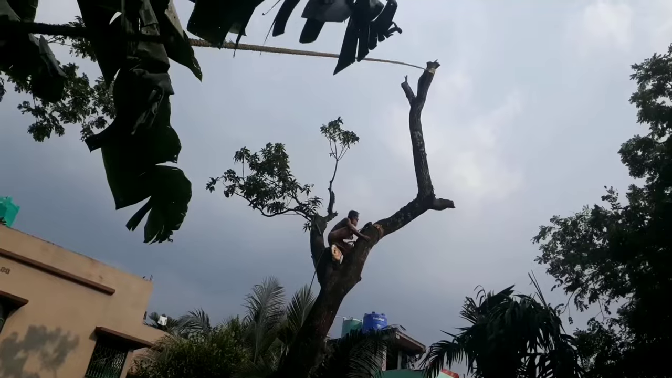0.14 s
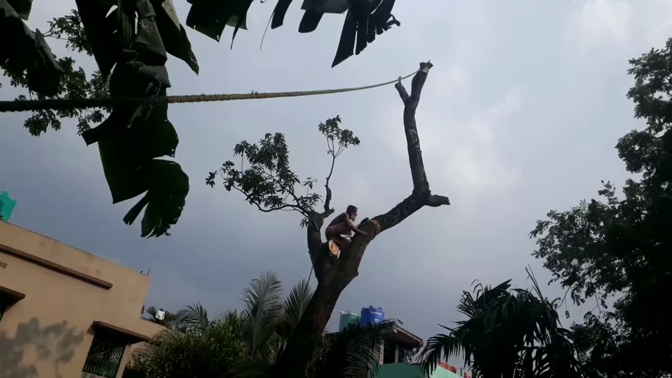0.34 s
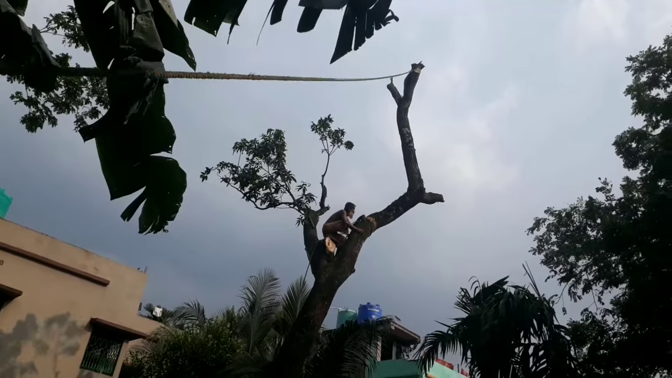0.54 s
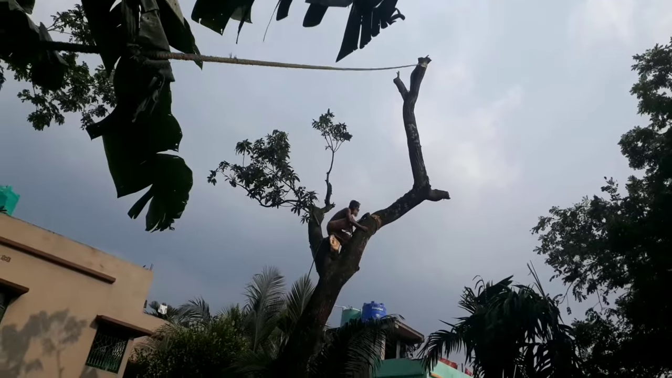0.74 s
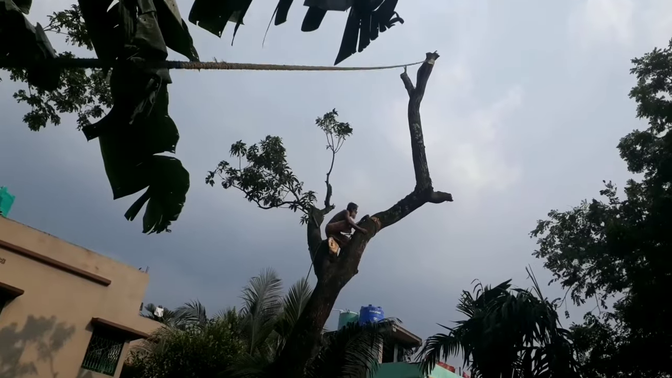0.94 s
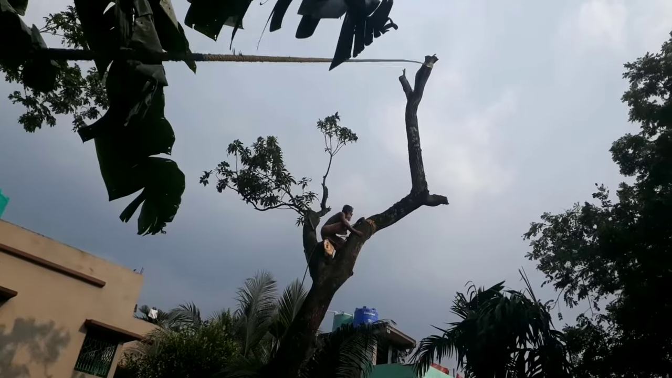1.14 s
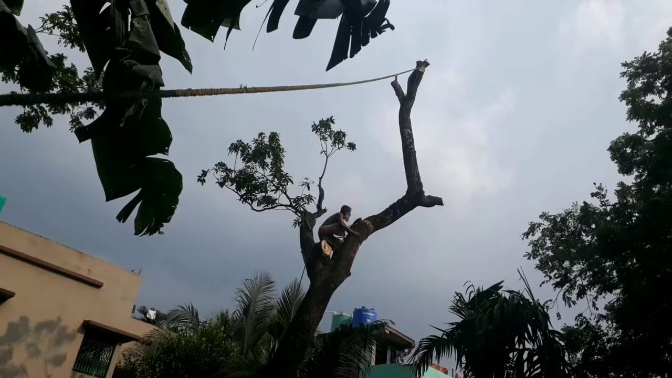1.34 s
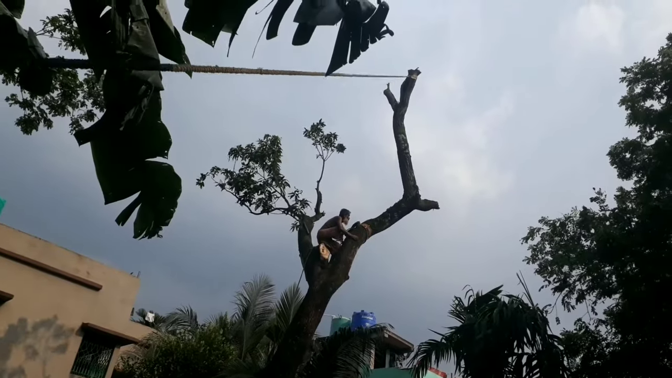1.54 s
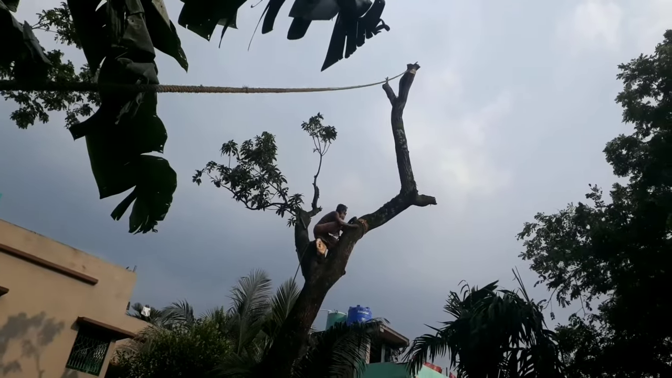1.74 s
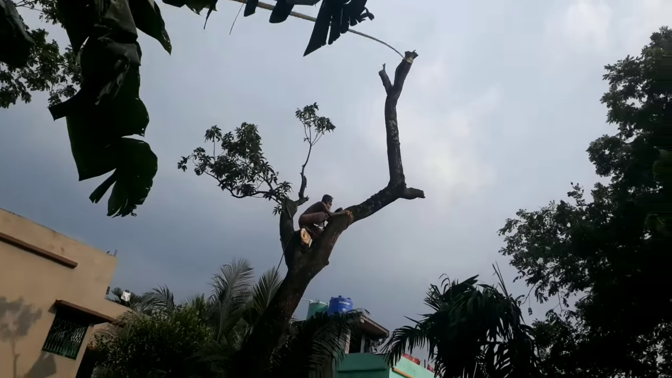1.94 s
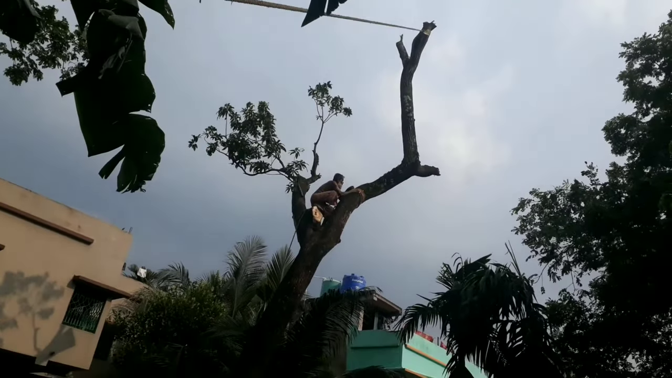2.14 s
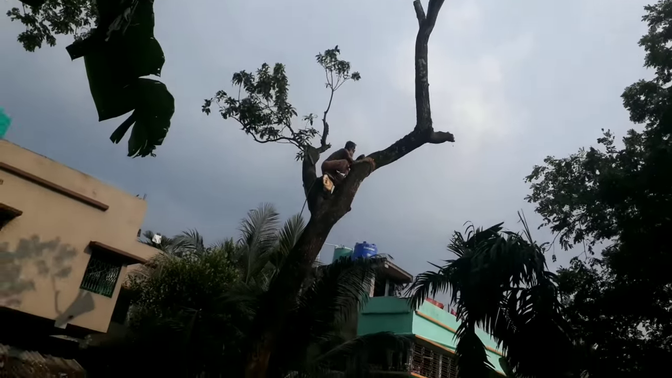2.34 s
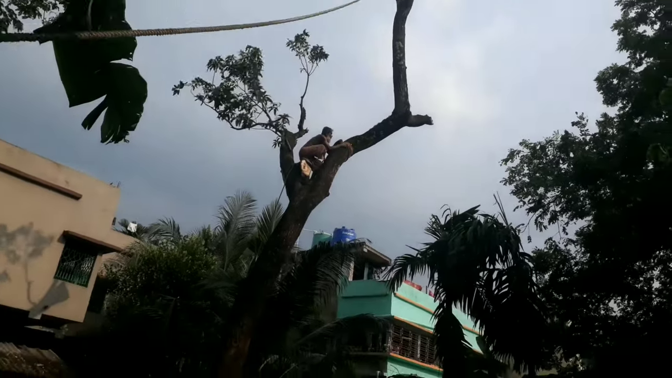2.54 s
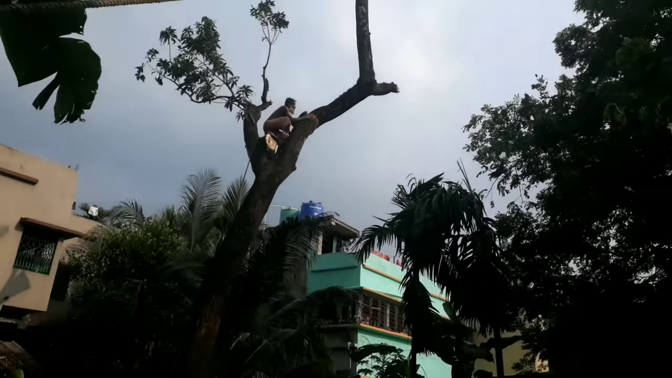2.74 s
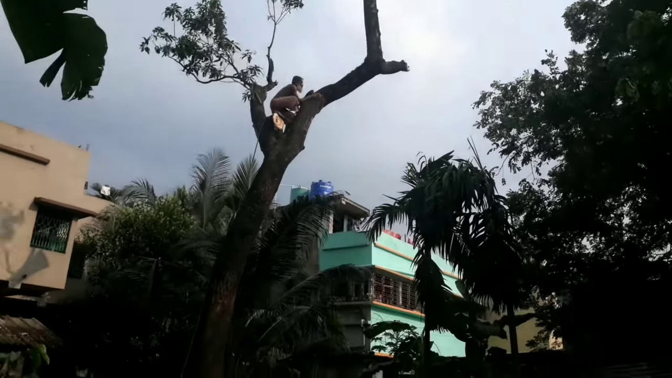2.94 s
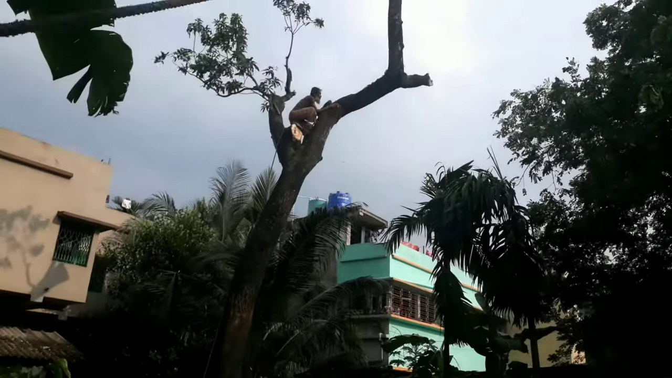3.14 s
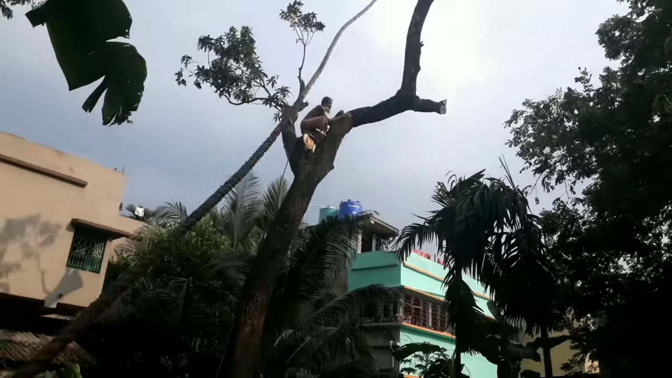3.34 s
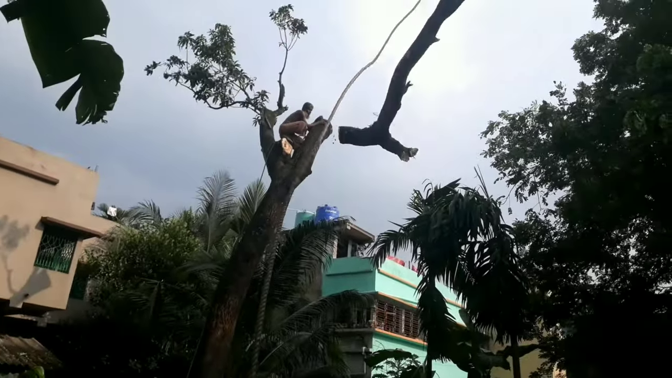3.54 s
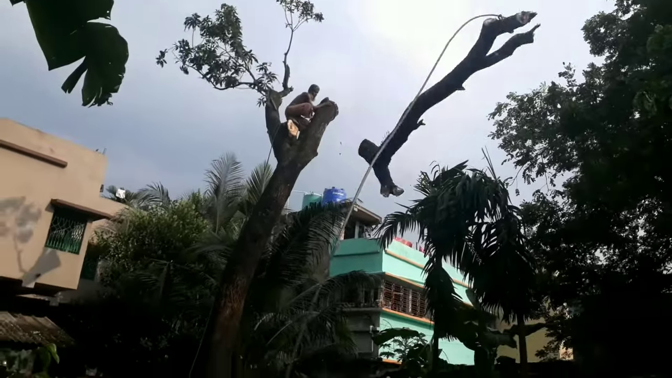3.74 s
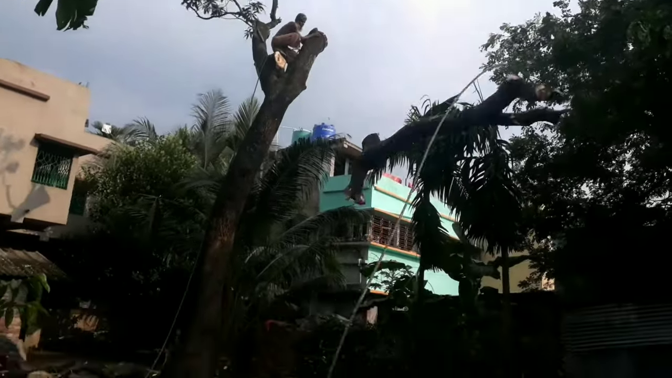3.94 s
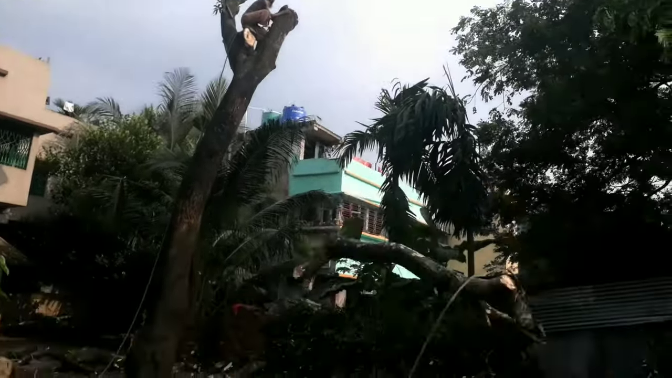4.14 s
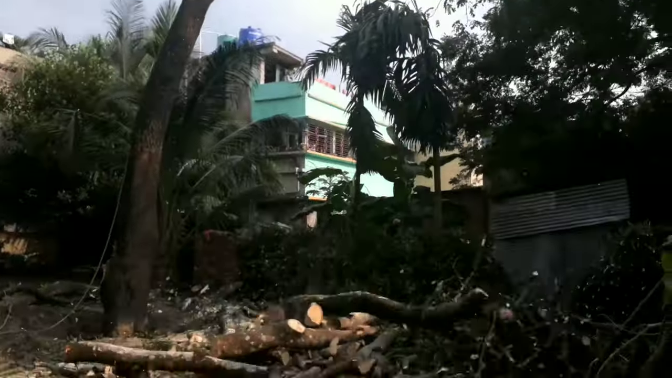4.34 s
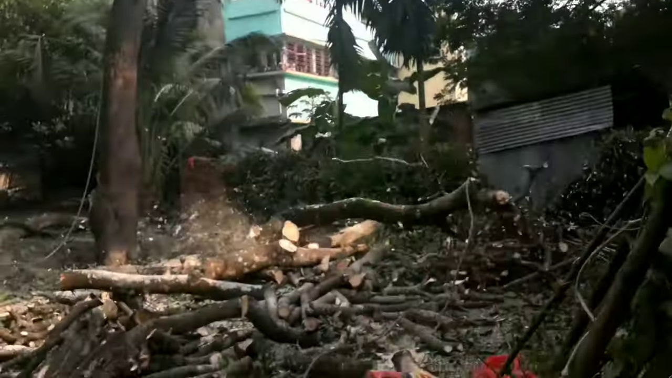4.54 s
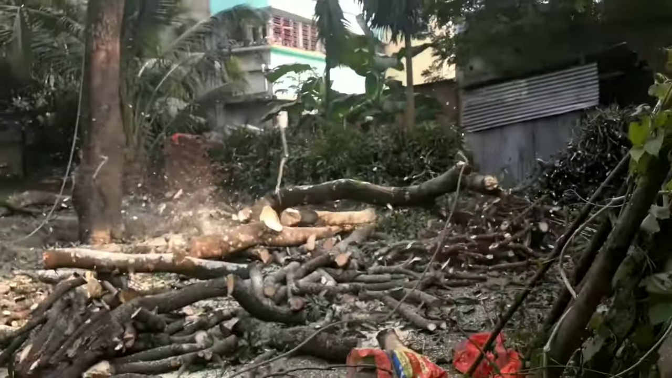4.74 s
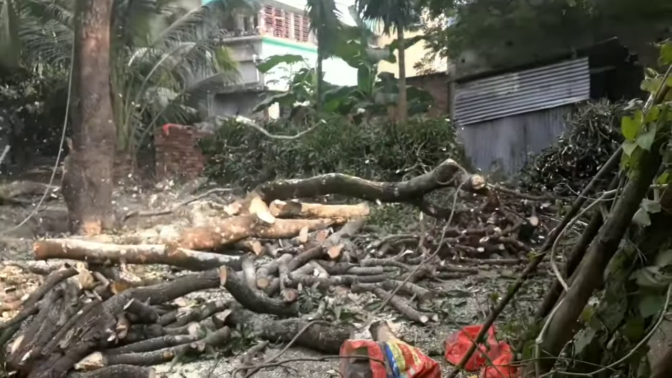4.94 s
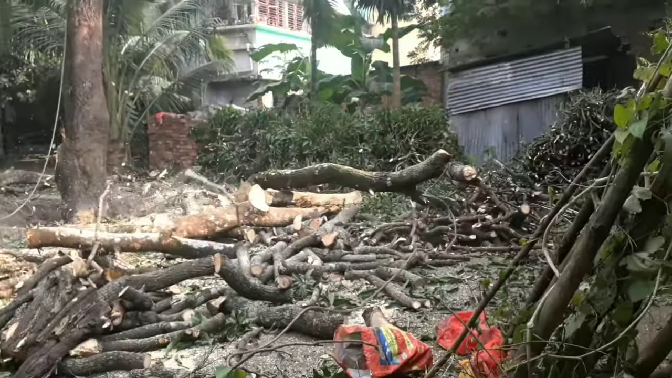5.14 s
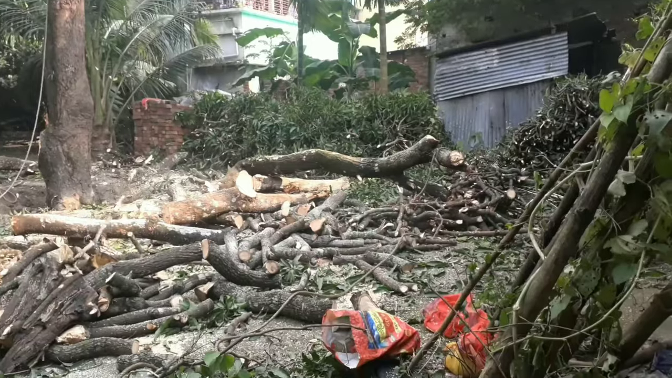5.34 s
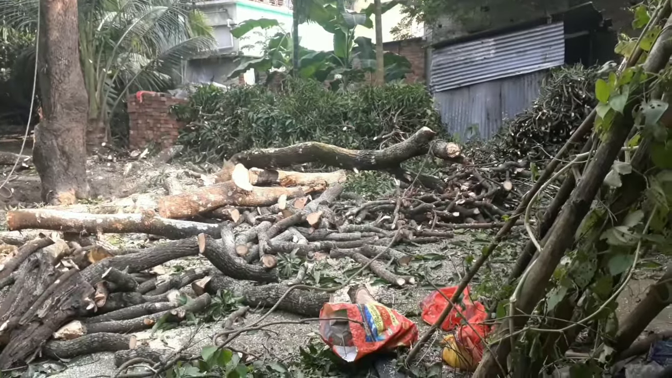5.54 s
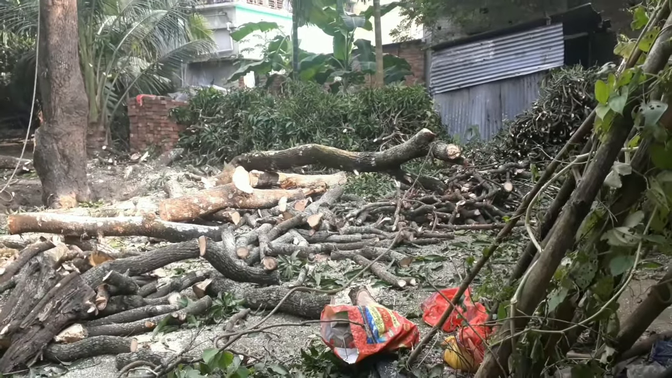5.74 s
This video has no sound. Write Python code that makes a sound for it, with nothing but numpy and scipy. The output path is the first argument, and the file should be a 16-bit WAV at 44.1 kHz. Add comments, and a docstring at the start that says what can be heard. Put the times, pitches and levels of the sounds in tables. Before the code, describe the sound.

A yard between houses, heard through a phone microphone: soft low traffic and wind noise with a faint, wavering distant motor whine throughout. At 0 s a small crack and a short splintery rustle fade. From about 0.95 to 1.2 s a tight burst of sharp woody cracks and hollow knocks rings out, echoing diffusely off walls, then quiet. Around 1.9 s there is a slight leafy tick and a rough creak grows until 2.1 s, when the limb tears in a dense, louder volley of snaps to about 2.5 s. Irregular cracks and splintering continue to 3.5 s. From 3.7 to 4.15 s twigs and leaves swish and snap. At 4.2-4.4 s comes the loudest moment, a heavy clattering crash onto logs with rumble and a deep ground thump. Afterwards loose wood settles in sparse knocks and rustles, with a more distinct crack near 5.3 s, fading towards 6 s.

```python
"""A sawn limb under the pull of a rope tears in bursts of cracks; its hinge creaks and it breaks off with more bursts.
Falling, it swishes through twigs and leaves and crashes onto a pile of logs, where loose pieces settle.
Each crack is a noise burst with woody rings; rustle, splinters and rumble are shaped noise in showers.
House walls answer with a diffuse echo; a far motor whines as wavering sines over soft yard noise throughout."""
import sys
import numpy as np
from scipy import signal
from scipy.fft import rfft, irfft, next_fast_len
from scipy.io import wavfile
from scipy.ndimage import uniform_filter1d, map_coordinates

SR = 44100
rng = np.random.default_rng(int(sys.argv[2]) if len(sys.argv) > 2 else 0)


def wav_record(signal):
    """Record a signal, one row per channel, as 16-bit PCM in the file named by sys.argv[1]."""
    frames = np.transpose(np.atleast_2d(signal))
    bounded = np.clip(frames, -1, 1)
    # unit amplitude maps onto the largest positive 16-bit level
    quanta = np.round(bounded * 32767).astype(np.int16)
    wavfile.write(sys.argv[1], SR, quanta)


N = 259792
LANDING_S = 4.5  # from here on the pile settles


def amp(db):
    """Decibels to gain."""
    return 10 ** (np.asarray(db) / 20)


def unit(x):
    """Scale x to rms 1."""
    return x / np.sqrt(np.mean(x ** 2) + 1e-20)


def along(points, hz):
    """Read a curve of (Hz, value) points on a log frequency axis."""
    f, value = np.transpose(points)
    return np.interp(np.log(hz + 1), np.log(f + 1), value)


def wobble(rate):
    """A smooth random curve with rate knots a second."""
    knots = rng.standard_normal(int(N * rate / SR) + 4)
    return map_coordinates(knots, [np.arange(N) * rate / SR])


def filtered(x, response):
    """Filter x by a response given as a function of frequency."""
    size = next_fast_len(len(x) + 8192)
    hz = np.fft.rfftfreq(size, 1 / SR)
    return irfft(rfft(x, size) * response(hz), size)[:len(x)]


def crackle(spectrum, spread_db, grain_s, clump_db):
    """Countless tiny breaks: noise in short bursts of unequal size that come in clumps, rms 1."""
    struck = rng.random(N) < 0.03
    sizes = amp(spread_db * np.minimum(rng.exponential(size=N), 3)) * struck
    bursts = signal.lfilter([1], [1, -np.exp(-1 / (grain_s * SR))], sizes)
    grains = bursts * amp(clump_db * wobble(40)) * rng.standard_normal(N)
    return unit(filtered(grains, lambda hz: amp(along(spectrum, hz))))


def crack_burst(noise, t, treble_db, ring_hz, ring_db):
    """Fibres part in a sharp noise tick, the split runs on more quietly and a thin splinter rings."""
    swell = 1 - np.exp(-t / 0.00082)
    tick = amp(-60 * t / 0.0082)
    split = amp(-2.5 - 60 * t / 0.05)
    tilt = [(700, 1), (1500, 1), (5000, -6.5), (7000, treble_db + 3), (16000, treble_db - 14)]
    body = unit(filtered(noise, lambda hz: amp(along(tilt, hz)))) * (tick + split) * swell
    fray = 0.06 * np.cumsum(noise)  # the phase of the ring wanders
    ring = amp(ring_db + 3.5 - 60 * t / 0.02) * np.sin(2 * np.pi * ring_hz * t + fray) * swell
    # differenced noise makes the first instant the brightest
    edge = amp(treble_db + 8.5 - 60 * t / 0.0058) * swell * np.diff(noise, prepend=0)
    return body + ring + edge


def woody_knock(noise, t, hz, cycles):
    """The piece rings for a few cycles in several modes, its pitch roughened by the tearing grain."""
    # modes of a stick: ratio to the knock pitch, level_db
    stick_modes = [(1, 6), (1.6, 1.5), (2.8, -34), (5.6, 6)]
    knock = np.zeros(len(t))
    for (ratio, level_db), mode_noise in zip(stick_modes, noise):
        tear = 0.026 * np.cumsum(mode_noise)
        decay = amp(level_db - 60 * t * hz * ratio ** 1.55 / cycles)  # high modes die sooner
        knock += decay * np.sin(2 * np.pi * hz * ratio * t + tear)
    return knock * (1 - np.exp(-t / 0.00068))


def limb_thuds(pushes):
    """Pushes ring the limb's low modes, softened because heavy wood meets wood slowly."""
    # low modes of the limb: centre_hz, width_hz, level_db
    limb_modes = [(166, 15, -9), (217, 20, 8), (306, 51, 2)]

    def response(hz):
        modes = 0
        for k, (centre, width, db) in enumerate(limb_modes):
            resonance = 1j * hz * width / (centre ** 2 - hz ** 2 + 1j * hz * width)
            modes = modes + (-1) ** k * amp(db) * resonance
        soft = 1 / (1 + 1j * hz / 400) ** 2
        return modes * soft

    return filtered(pushes, response)


def snaps():
    """Each break is a burst of crack noise, a short woody knock and a push on the limb's low modes."""
    # snaps of fibres, twigs and logs, in relative levels: start_s, crack_db, knock_pitch_hz,
    # then in dB re crack: knock_db, treble_db, thud_db; splinter ring_hz, ring_db re crack
    snap_list = [(0.0127, -20, 694, -0.5, -24, -20, 1790, -13), (0.0331, -33, 662, 0, -1, -17, 1610, -4),
                 (0.0817, -40, 450, -13, 2, -21, 1500, -4), (0.9442, -46, 732, -5, 2, -14, 1810, -4),
                 (0.9647, -36, 649, 0, -5, -17, 1550, -6), (0.9886, -38, 700, -1, 0, -16, 4400, -4),
                 (1.0111, -23, 695, 8.5, -11, -7, 3300, -4), (1.0311, -18, 690, 9, -6.5, -3, 3130, -4),
                 (1.0539, -10, 619, 5.5, -8.5, -3, 1600, -16), (1.0724, -11.5, 650, 5, -12, -3, 2070, -14),
                 (1.094, -18, 510, -4, -13, -14, 4180, 4), (1.1058, -14, 695, -10, -12.5, -25, 1500, -15),
                 (1.1458, -17.5, 443, -9, -14, -24, 2700, -4), (1.1694, -24, 590, -7, -21, -24, 3850, -6),
                 (2.037, -32.5, 1380, -6, -34, -30, 1580, -4), (2.0537, -31, 942, 3, -25, -28, 1630, 7),
                 (2.0733, -26.5, 970, 2, -13, -23, 2380, 5), (2.0931, -20, 640, -1, -3.5, -7.5, 4140, -5),
                 (2.1242, -9.5, 665, 6.5, -10, 4.5, 1630, 1), (2.1439, -8.5, 730, 7, -10, 2.5, 1560, 2.5),
                 (2.1526, -12, 920, 6, -15, 5, 1730, -6), (2.165, -11, 663, 4, -11, -15, 1570, -2),
                 (2.1744, -14.5, 543, 7, -8, -16, 3700, -1), (2.1848, -10, 442, 1.5, -9, 1, 1570, -1),
                 (2.196, -10.5, 355, -6, -13, -17, 1840, -9), (2.2035, -11.5, 678, 5, -8, -18, 2330, -11),
                 (2.2352, -8.5, 703, 0.5, -14, -24, 1550, 3), (2.2554, -21, 660, 4, -16, -13, 3760, -2),
                 (2.287, -29, 490, -10, -21, -16, 3750, 1), (2.3072, -21.5, 706, 3, -10, -19, 1600, -4),
                 (2.3187, -17, 700, 4, -7, -15, 1560, 6), (2.3329, -17, 555, -6, -3, 4, 1540, -7),
                 (2.3587, -24.5, 534, 8, -9, -18, 2920, -2), (2.386, -10, 1660, -20, -13, -30, 1686, -3),
                 (2.4245, -18, 474, -1.5, -13, -22, 1680, 0.5), (2.4562, -18, 600, -10, -12, -7, 1530, -8),
                 (2.4985, -28, 501, -3, -15, -8, 3550, -1), (2.6534, -25.5, 517, -10, -10, -22, 1640, -13),
                 (2.6912, -32, 735, -4, -4, -3, 1550, -16), (2.7075, -16.5, 527, -4, -27, -16, 1680, -1.5),
                 (2.7756, -15, 1590, -10, -10.5, -7, 1590, -7), (2.7949, -18.5, 585, -12, -5, -1, 3040, 0),
                 (2.812, -13, 647, -1.5, -18, -16, 2830, 1), (2.8498, -28, 520, 4, -23, -18, 1640, 0),
                 (2.877, -25, 520, 4, -22, -22, 2820, -1), (2.9618, -19, 665, -2, -8, -21, 2120, -12),
                 (3.1654, -28.5, 624, -4, -6, -1.5, 1640, -7), (3.1886, -25.5, 590, -7, -12, -24, 1610, 0),
                 (3.3393, -26, 544, 3.5, -11, 4, 1600, -10), (3.3587, -21.5, 587, 3, -18, -17, 2110, 2),
                 (3.3716, -27.5, 590, -4, -8, -5, 1550, -6), (3.3912, -31, 1310, 8, -4, -14, 2280, 4),
                 (3.4332, -31.5, 1130, 7, -21, -21, 2680, 5), (3.4471, -30, 1400, 6, -24, -22, 2400, 0),
                 (3.4868, -41, 1070, 4, -19, -8, 1500, -4), (3.5913, -33.5, 1280, 3, -24, -22, 1550, 7),
                 (3.6555, -28, 1960, -10, -15, -19, 2350, 4.5), (3.6721, -33, 627, -6, -19, -14, 2370, -1),
                 (3.694, -21.5, 1300, -7, -19, -20, 1540, -4),
                 (3.7055, -23.5, 358, -18, -8, -25, 3720, -14), (3.803, -16.5, 580, -4, -13, -21, 1630, -1),
                 (3.8153, -21, 1010, -4, 0, -25, 3940, 1), (3.8342, -19, 870, -2.5, 2, -23, 1770, -1),
                 (3.86, -25, 2000, -10, -3, -26, 2410, -1), (3.8884, -23, 745, -4, -9, -25, 3820, -9),
                 (3.933, -19, 800, -1, -9, -27, 4160, -2), (3.9457, -23, 1330, -10, -14, -31, 1540, 7),
                 (4.0527, -18, 1140, -2, -17, -35, 2400, -2), (4.117, -22, 1720, 3.5, -9, -22, 1750, -7),
                 (4.1949, -26, 666, -7, -15, -15, 1630, -4), (4.2037, -23.5, 726, 3, -3, -1, 3420, -7),
                 (4.232, -7.5, 1080, 6, -6.5, -6, 1520, 6.5), (4.2407, -3, 673, -3, -10, -3, 1600, -7),
                 (4.2577, -4, 346, -15, -7, -7, 3410, -1), (4.262, -1.5, 805, -2, -10, -0.5, 1440, -2.5),
                 (4.2824, -1.5, 1230, -5, -14, -7, 1570, -7), (4.2946, -3.5, 1170, -17, -6.5, -3, 2180, -9),
                 (4.3162, -4, 900, 2, -10, -7, 1760, -7), (4.3464, -7.5, 904, -5, -20, -7, 3180, 0.5),
                 (4.3524, -18, 392, -2, -29, -2, 1530, -4), (4.3684, -25, 759, -6, -19, -12, 1510, -13),
                 (4.398, -15.5, 700, 7.5, -22, -5, 1720, -4), (4.4304, -20, 406, -6, -10, 14, 1740, -11),
                 (4.4482, -22, 396, -21, -6, 3, 1880, -11), (4.5357, -15.5, 794, -22, -5.5, -6, 3300, -9),
                 (4.5528, -27.5, 725, -9, -21, 4, 3510, -2), (4.5965, -22.5, 610, -14, -16, -17, 2040, -1),
                 (4.6593, -37, 355, -10, -18, -3, 2170, -4), (4.7274, -28, 355, -14, -26, -8.5, 1790, -4),
                 (4.8587, -35, 993, 7, -19, -4, 1516, 6), (5.0964, -26, 866, 1, -22, -11, 1570, -11),
                 (5.1142, -25, 384, -6, -17, -22, 1530, 3), (5.1876, -30.5, 1450, -6, -26, -14, 3260, 0),
                 (5.2424, -32.5, 353, -20, -3, -6, 2850, -2), (5.2667, -19.5, 859, -5, -9.5, -4, 3520, 0),
                 (5.2782, -30.5, 460, 6, -19, -18, 3680, -2),
                 (5.3039, -11.5, 618, -7.5, -14.5, -31, 1840, -2),
                 (5.311, -24.5, 513, 6, -26, -26, 1500, 5), (5.3318, -27, 705, 10, 1, -6, 1520, -9),
                 (5.3972, -31, 1770, -10, -19, -19, 1770, -4), (5.4624, -29.5, 622, -21, -10, -20, 3070, 0),
                 (5.4995, -28.5, 1195, 5, -15, -10, 1580, -4),
                 (5.5253, -26.5, 1480, -2, -13, -19, 1530, -12),
                 (5.5834, -29, 1050, -2, -15, -17, 2800, -1), (5.7118, -30.5, 620, -15, -13, -17, 3310, -4),
                 (5.7906, -27.5, 495, -19, -39, -24, 1730, -2)]
    held_cycles, loose_cycles = 17.8, 25.7  # cycles to fall 60 dB: held by the limb, loose on the pile
    push_gain_db = 38  # a one-sample push rings the narrow modes weakly
    out, pushes, t = np.zeros(N + SR), np.zeros(N), np.arange(SR // 4) / SR
    for start_s, db, hz, knock_db, treble_db, thud_db, ring_hz, ring_db in snap_list:
        noise = rng.standard_normal((5, len(t)))  # one row for the crack, one for each stick mode
        cycles = loose_cycles if start_s > LANDING_S else held_cycles
        crack = crack_burst(noise[0], t, treble_db, ring_hz, ring_db)
        knock = woody_knock(noise[1:], t, hz, cycles)
        start = round(start_s * SR)
        out[start:][:len(t)] += amp(db - 4.5) * crack + amp(db + knock_db - 3.5) * knock
        pushes[start] = amp(db + thud_db + push_gain_db)
    return out[:N] + limb_thuds(pushes)


def brushes():
    """Twigs full of leaves, whipped by the falling limb, each give a soft-edged swish of crackling noise."""
    # whipped twigs: start_s, relative level_db, rise_s, t60_s
    twig_hits = [(1.909, -22, 0.0022, 0.053), (3.703, -12, 0.0021, 0.04), (3.828, -6, 0.0036, 0.076),
                 (3.9295, -4, 0.0017, 0.061), (3.9689, -12.5, 0.004, 0.053), (4.088, -19.5, 0.0043, 0.09),
                 (4.1415, -20, 0.0035, 0.054)]
    # leaf colour: pitch_hz, density_db (per Hz)
    leaf_colour = [(600, -13), (1200, 2), (4000, -5), (9000, -2), (16000, -12)]
    level, t = np.zeros(N + SR), np.arange(SR // 4) / SR
    for start_s, db, rise_s, t60_s in twig_hits:
        swish = amp(db - 10 - 60 * t / t60_s) * (1 - np.exp(-t / rise_s)) ** 2
        level[round(start_s * SR):][:len(t)] += swish
    return level[:N] * crackle(leaf_colour, spread_db=5, grain_s=0.002, clump_db=1.5)


def creak():
    """The hinge of uncut wood strains ever harder before it tears: fibres slip in quick rough jerks."""
    # hinge colour: pitch_hz, density_db (per Hz)
    hinge_colour = [(500, -31), (950, 3.5), (1400, -2), (2000, -3), (2600, -19), (5000, -43)]
    span_s, span_db = (1.87, 2.12), (-49, -36)  # start and end
    level = amp(np.interp(np.arange(N) / SR, span_s, span_db, left=-120, right=-120))
    return level * crackle(hinge_colour, spread_db=2, grain_s=0.003, clump_db=2.2)


def thumps():
    """The soil gives one deep, quickly damped swing under each heavy contact."""
    # heavy wood shakes the ground: start_s, relative level_db
    contacts = [(1.1, -38), (3.346, -34), (4.25, -24), (4.35, -29), (4.394, -10)]
    ground_hz, t60_s, rise_s = 83.6, 0.18, 0.01
    out, t = np.zeros(N + SR), np.arange(SR // 2) / SR
    swing = amp(-60 * t / t60_s) * (1 - np.exp(-t / rise_s)) * np.sin(2 * np.pi * ground_hz * t)
    for start_s, db in contacts:
        out[round(start_s * SR):][:len(t)] += amp(db) * swing
    return out[:N]


def showers():
    """Gains of rustle, splinter and rumble: every shower rises, holds, dies fast and leaves a slow trickle."""
    # debris after each tear or fall: start_s, rise_s, hold_s, t60_s, rustle_db, splinter_db, rumble_db
    shower_list = [(0.0, 0.019, 0.007, 0.45, -43.5, -34, -49), (0.634, 0.038, 0.04, 0.47, -62, -68, -64),
                   (0.79, 0.011, 0.24, 0.57, -60, -70, -58), (0.965, 0.098, 0.029, 0.43, -36.5, -25.5, -33),
                   (1.65, 0.023, 0.073, 0.93, -61, -61, -70), (1.815, 0.057, 0.26, 0.2, -54.5, -51, -60),
                   (2.104, 0.029, 0.15, 0.8, -28.5, -23, -29.5), (2.62, 0.03, 0.026, 0.18, -43, -45.5, -50),
                   (2.69, 0.02, 0.02, 0.58, -38, -30.5, -36.5), (2.77, 0.035, 0.047, 1, -35.5, -30.5, -33),
                   (2.955, 0.011, 0.022, 0.51, -65, -43, -34.5),
                   (3.335, 0.004, 0.018, 0.2, -48, -25.5, -29), (3.4, 0.03, 0.03, 0.7, -53, -42.5, -49),
                   (3.675, 0.03, 0.06, 0.72, -46.5, -48, -46.5),
                   (3.796, 0.012, 0.031, 0.43, -36.5, -39, -38.5),
                   (3.914, 0.019, 0.012, 0.33, -43, -43, -51),
                   (4.223, 0.017, 0.16, 0.34, -26, -22.5, -17.5),
                   (4.506, 0.028, 0.022, 1.0, -37, -37.5, -30.5), (4.69, 0.03, 0.056, 1, -46.5, -46, -45),
                   (4.926, 0.046, 0.013, 0.5, -46, -45, -43.5),
                   (5.053, 0.033, 0.03, 0.57, -42.5, -40.5, -45), (5.27, 0.068, 0.066, 1, -45.5, -44, -46),
                   (5.496, 0.063, 0.02, 0.38, -54, -44, -41), (5.772, 0.013, 0.13, 0.5, -64, -47, -44)]
    # the wood never quite rests: rustle_db (practically silent), splinter_db, rumble_db
    stir_db = [-120, -58, -60]
    # the trickle, for rustle, splinter and rumble
    linger_db, linger_t60_s = np.array([[-19], [-22.5], [-22.5]]), np.array([[6], [3.6], [3.2]])
    t = np.arange(N) / SR
    power = amp(stir_db)[:, None] ** 2 * np.ones(N)
    for start_s, rise_s, hold_s, t60_s, *db in shower_list:
        after = np.clip(t - start_s - rise_s - hold_s, 0, None)
        trickle = amp(linger_db - 60 * after / linger_t60_s)
        rise = np.clip((t - start_s) / rise_s, 0, 1) ** 2
        shape = rise * (amp(-60 * after / t60_s) + trickle)
        power = power + (amp(db)[:, None] * shape) ** 2
    return np.sqrt(power)


def debris():
    """Leaves and bark rustle, fibres splinter and the heavy wood rumbles under the single snaps."""
    # colours of the three layers: pitch_hz, density_db (per Hz)
    rustle_colour = [(900, -30), (1500, -5), (2200, -2.5), (4000, -4.5), (6500, -8.5), (10000, -11),
                     (16000, -19)]
    splinter_colour = [(150, -36), (250, -26), (388, -3), (647, -2.5), (807, -4), (906, -4), (1050, -6),
                       (1640, -9.5), (2190, -17), (4000, -34), (5200, -37), (8800, -120)]
    rumble_colour = [(18, -55), (30, -76), (68, -10.5), (103, -2.5), (145, 1.5), (241, 1), (386, -10),
                     (419, -5), (500, -21), (650, -16), (1100, -120)]
    rustle_gain, splinter_gain, rumble_gain = showers()
    rumble = unit(filtered(rng.standard_normal(N), lambda hz: amp(along(rumble_colour, hz))))
    rustle = crackle(rustle_colour, spread_db=1.5, grain_s=0.004, clump_db=1.2)
    splinter = crackle(splinter_colour, spread_db=5, grain_s=0.0068, clump_db=3.5)
    return rustle_gain * rustle + splinter_gain * splinter + rumble_gain * rumble


def walls(x):
    """A diffuse echo whose frequencies die at their own speeds, from a fresh noise tail for every 50 ms of sound."""
    # decay of the echo off the house walls: pitch_hz, t60_s
    wall_decay = [(150, 0.82), (700, 0.35), (3000, 0.5), (12000, 0.44)]
    out, step = np.zeros(N + 2 * SR), SR // 20
    delay = 300  # samples
    for start in range(0, N, step):
        hz, t, grid = signal.stft(rng.standard_normal(SR // 2), SR, nperseg=256)
        decay = amp(-60 * t / along(wall_decay, hz)[:, None])
        tail = signal.istft(grid * decay, SR, nperseg=256)[1]
        echo = signal.fftconvolve(x[start:start + step], tail / np.linalg.norm(tail))
        out[start + delay:][:len(echo)] += echo
    return out[:N]


def motor_whine():
    """A far motor: steady partials whose level and phase waver a little at random."""
    # partials of the whine: pitch_hz, relative level_db
    partials = [(608.3, -53), (845.2, -62.5), (1217, -62), (1825, -67), (2428, -67), (2530, -68.5),
                (3036, -71)]
    t, whine = np.arange(N) / SR, np.zeros(N)
    for hz, db in partials:
        level = amp(db + 0.5 + 2.5 * wobble(22))
        whine += level * np.sin(2 * np.pi * hz * t + 2.1 * wobble(17))
    return whine


def yard_air():
    """Far traffic and wind in the trees: coloured noise in faint patches of time and frequency."""
    # yard colour: pitch_hz, density_db (per Hz)
    yard_colour = [(15, -34), (25, 13.5), (242, -10.5), (317, 6), (531, -8), (607, -5), (1650, -11),
                   (2480, -15.5), (2840, -18), (3080, -24), (3430, -21.5), (8590, -33.5), (16000, -37)]
    grid = signal.stft(rng.standard_normal(N), nperseg=512)[2]
    field = uniform_filter1d(rng.standard_normal(grid.shape), 6, axis=0)
    field = uniform_filter1d(field, 14, axis=1)
    patchy = signal.istft(grid * amp(unit(field)), nperseg=512)[1][:N]  # patches of 1 dB rms
    air = unit(filtered(patchy, lambda hz: amp(along(yard_colour, hz))))
    return amp(-49.5 + 0.87 * wobble(2.14)) * air


def scene():
    """Mix the limb, its echo and the yard."""
    breaks = snaps() + brushes()
    # echo of the breaks up in the crown, then down on the nearer pile
    crown_echo_db, pile_echo_db = -4, -7.5
    send = amp(np.where(np.arange(N) / SR < LANDING_S, crown_echo_db, pile_echo_db))
    echo = walls(send * breaks)
    mix = breaks + echo + thumps() + debris() + creak() + yard_air() + motor_whine()
    return mix[None]


def record(dry):
    """The phone's microphone colours the sound, rounds off the highest peaks and cuts all above its band limit."""
    # microphone colour: pitch_hz, gain_db
    mic_colour = [(30, -28), (70, -4.5), (2400, -2.5), (3600, 0), (5100, -2.5), (6400, 0.5), (7800, -1.5),
                  (8800, 2.5), (9600, -2.5), (15000, -1)]
    top_hz, ceiling = 15850, 0.97
    x = filtered(dry[0], lambda hz: amp(along(mic_colour, hz)))
    x = x / (1 + np.abs(x / ceiling) ** 6) ** (1 / 6)
    return filtered(x, lambda hz: hz < top_hz)[None]


dry = scene()
out = record(dry)
wav_record(out)
```